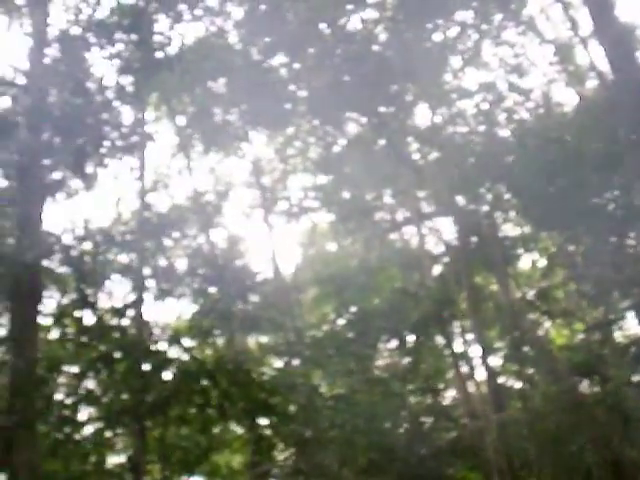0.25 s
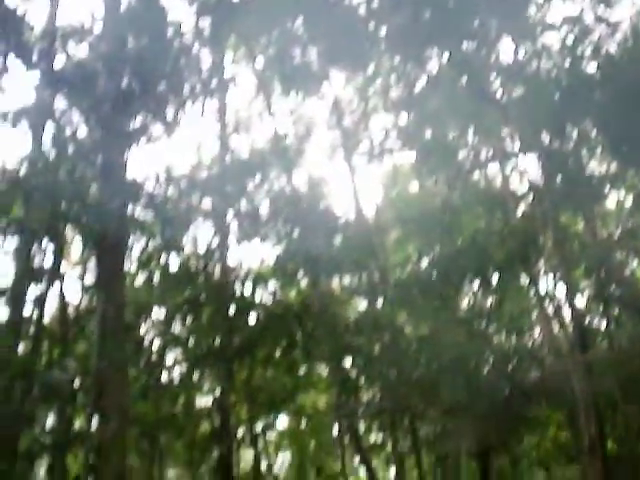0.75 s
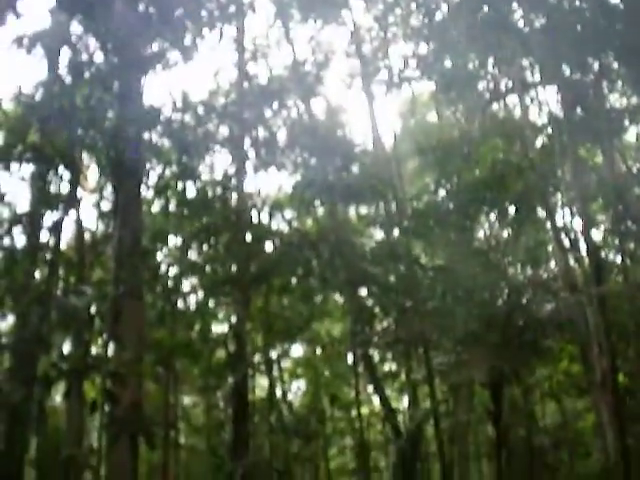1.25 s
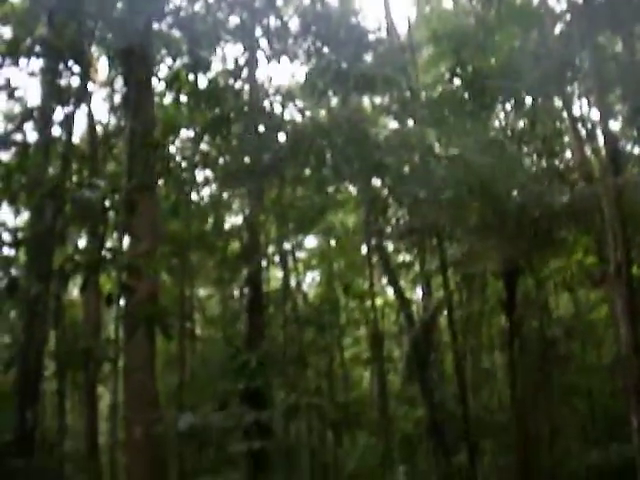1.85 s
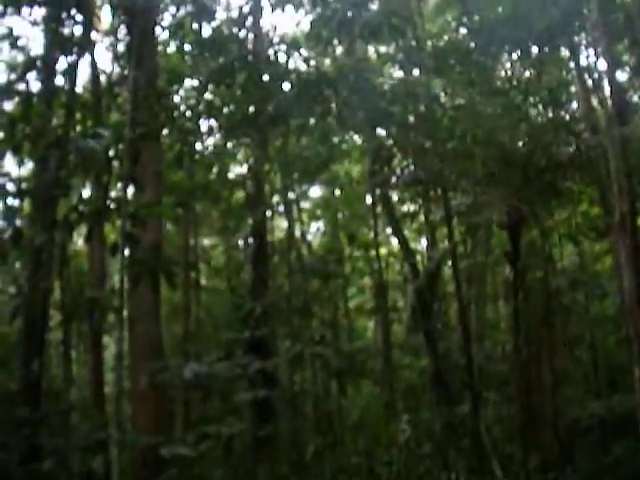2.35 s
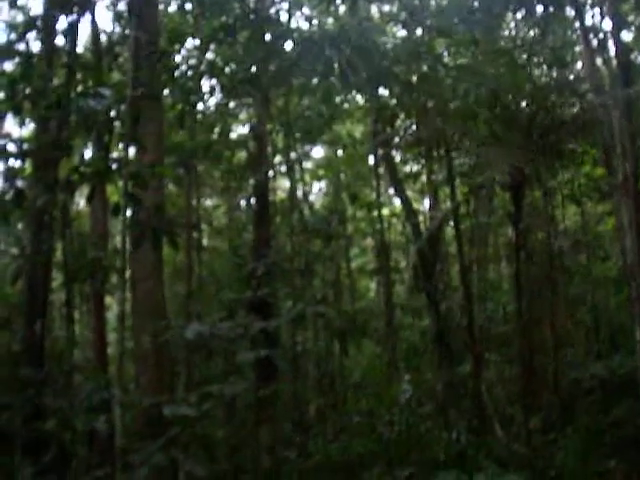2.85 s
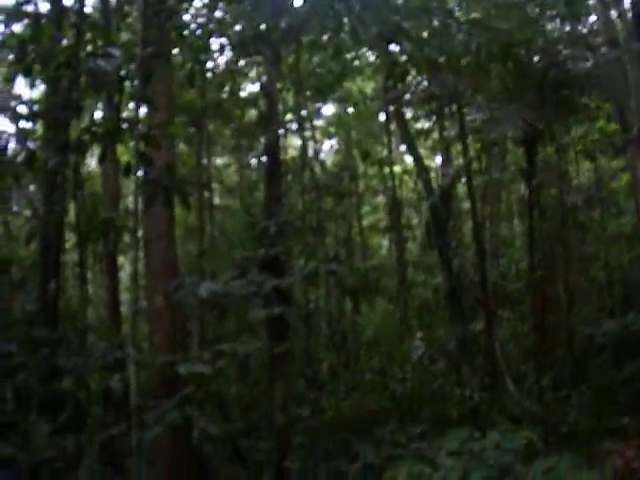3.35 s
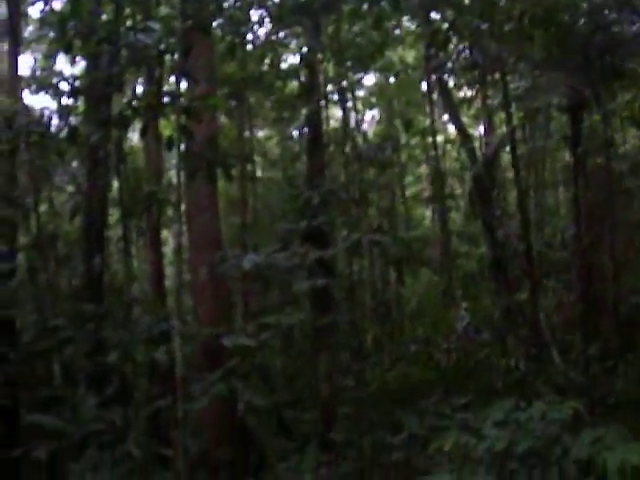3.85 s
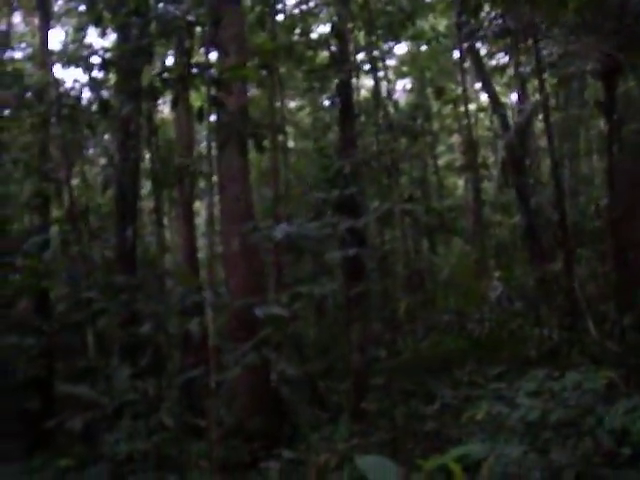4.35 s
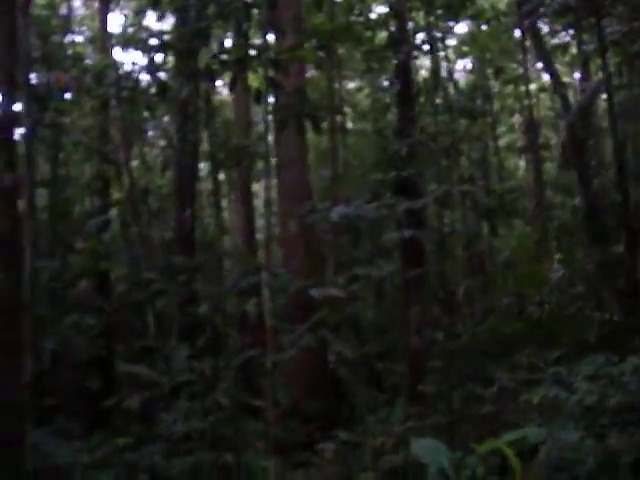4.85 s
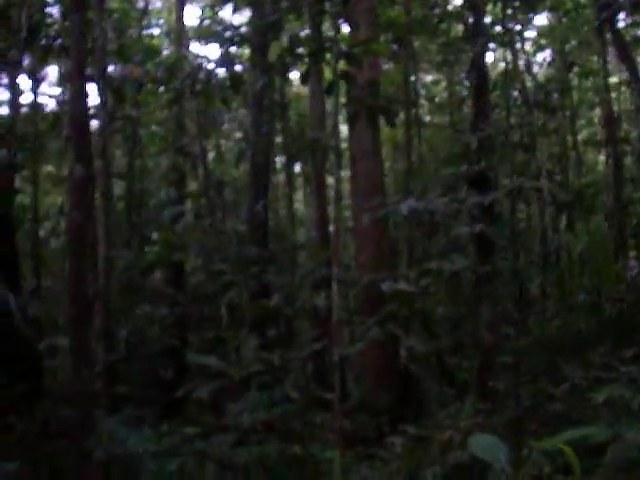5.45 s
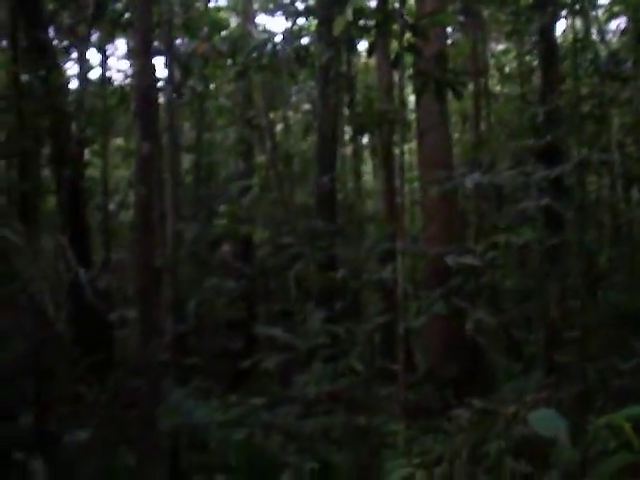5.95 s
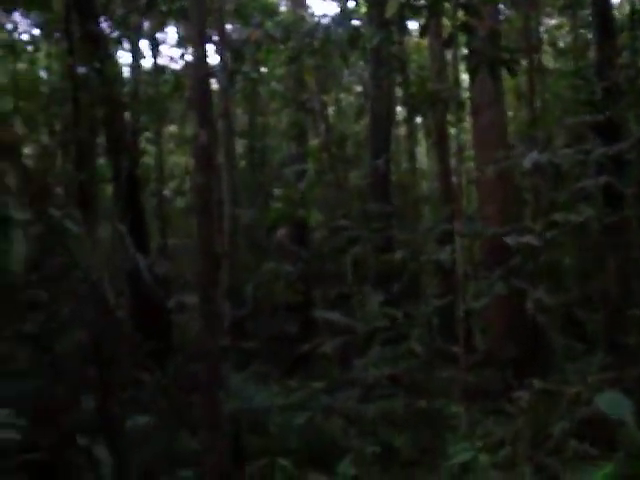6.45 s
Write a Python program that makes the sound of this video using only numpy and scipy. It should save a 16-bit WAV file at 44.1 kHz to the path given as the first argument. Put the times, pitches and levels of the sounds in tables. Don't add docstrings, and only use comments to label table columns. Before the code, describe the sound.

Continuous high cicada singing among trees, heard through a cheap mono camera with dull, cut-off treble. The closest insect pulses quickly, pauses briefly around three seconds, throbs strongly, then cuts out past four seconds with a short woodland echo. Softer distant cicadas shimmer on to the end, one swelling and sinking slightly lower, over steady hiss, electrical buzz, a faint whine and small casing clicks.

```python
import sys
import numpy as np
from scipy import signal
from scipy.fft import rfft, irfft
from scipy.io import wavfile

SR = 44100
rng = np.random.default_rng(int(sys.argv[2]) if len(sys.argv) > 2 else 0)


def ratio(d):
    e = np.asarray(d, float) / 20
    return 10 ** e


def output_pcm(signal):
    pcm = np.clip(np.atleast_2d(signal).T, -1, 1) * 32767
    wavfile.write(sys.argv[1], SR, np.round(pcm).astype(np.int16))


N = 295007

# [t/s, level/dB]
NEAR_EFFORT = [
    (0, -47),
    (.22, -53),
    (.36, -49),
    (.7, -51.5),
    (1.2, -47.5),
    (1.5, -51),
    (2.6, -50.5),
    (3.45, -48.5),
    (4.0, -47),
]
# [f/Hz, width/Hz, level/dB]
NEAR_BODY = [
    (6380, 240, 0),
    (6130, 280, -12),
    (6720, 400, -12),
]
# [first throb t/s, rate/Hz, depth reached by then/dB]
THROB_RUNS = [
    (.02, 6.8, 4),
    (1.64, 7.87, 5),
    (3.06, 2.95, 8),
    (3.4, 6.9, 15),
    (4.26, 6.9, 15),
]
NEAR_STOP_S, NEAR_RELEASE_S = 4.16, 0.048
# [t/s, level/dB, upper group against lower group/dB]
FAR_LEVEL = [
    (0, -48, -5),
    (1.2, -50.5, -6.5),
    (2.3, -50, -7.5),
    (3.6, -50.5, -6.5),
    (4.3, -51, -5.5),
    (6.69, -51, -5.5),
]
# [f/Hz, width/Hz, level/dB, filter steepness]
FAR_BODY = [
    (6180, 430, 0, 2),
    (6750, 480, .5, 3),
]
# [crest t/s, lift/dB]
WAVES = [
    (.42, 1.5),
    (1.2, 4),
    (1.76, 1),
    (2.2, 2),
    (2.9, 0.5),
    (4.4, 1.5),
    (4.9, 2),
    (5.4, 2.5),
    (5.9, 1.5),
    (6.35, 2),
]
WAVE_S, UPPER_SHARE = 0.11, 0.46
# [crest t/s, level/dB]
LOW_SWELLS = [
    (.5, -59.5),
    (1.6, -60.5),
    (2.85, -57),
    (4.13, -58),
    (5.0, -64.5),
    (5.3, -60.5),
    (6.05, -64),
    (6.65, -60.5),
]
# [f/Hz, width/Hz, level/dB]
LOW_BODY = [
    (5620, 380, 0),
]
LOW_REST_DB, SWELL_DB_PER_S, SINK_DB_PER_S = -73, 21, 46
# [f/Hz, level per Hz/dB]
HISS = [(15, -2), (30, 1.5), (55, 1), (100, -1.5), (200, -2), (400, -3), (1000, -7.5), (1600, -10.5),
        (2200, -12.5), (3500, -15.5), (5000, -18), (8000, -17.5)]
HISS_DB = -47.5
FRAME_HZ, SCREEN_HZ = 29.995, 59.828
# [f/Hz, level/dB]
WHINE = [
    (7499, -66.5),
]
# [t/s, peak level/dB, ring f/Hz, width/Hz]
TICKS = [(.2548, -46, 7400, 1000), (.455, -45, 7700, 600), (.5612, -33, 7500, 900),
         (.5612, -38, 4500, 4000), (2.6595, -28.5, 1800, 1300), (2.8115, -36, 3500, 2200),
         (4.3824, -46, 7600, 800), (5.434, -48, 3600, 300), (5.441, -48, 3600, 300),
         (5.7605, -26.5, 5100, 4200), (5.7606, -38, 7600, 900), (5.7613, -31, 6000, 1400),
         (5.7617, -35, 3300, 2000), (5.7675, -36, 7000, 1500), (5.983, -42, 3500, 2000),
         (6.1375, -42, 1500, 1200), (6.354, -42, 2600, 1200), (6.363, -41, 3100, 900),
         (6.418, -47, 3600, 300), (6.479, -43, 3650, 500), (6.483, -44, 2800, 1200)]
SAMPLING = (160, 441)
# [f/Hz, level/dB]
SKIRT = [(5500, -1), (7000, 1), (7500, -5.5), (8000, -11), (8500, -20), (8800, -29.5), (9050, -39.5),
         (9300, -61.5)]


def evened(x):
    return x / np.sqrt(np.mean(x ** 2) + 1e-20)


def read(points, hz):
    f, value = np.transpose(points)
    return np.interp(np.log(hz + 1), np.log(f + 1), value)


def curves(rows):
    s, *columns = np.transpose(rows)
    return [np.interp(np.arange(N) / SR, s, column) for column in columns]


def resonate(x, hz, width, order=2):
    band = [hz - width / 2, hz + width / 2]
    return signal.sosfilt(signal.butter(order, band, "bandpass", fs=SR, output="sos"), x)


def smooth(x, hz):
    r = np.exp(-2 * np.pi * hz / SR)
    return signal.lfilter([1 - r], [1, -r], x)


def trunks(x, t60, wet_db, turn_s):
    hop = round(turn_s * SR)
    at = np.arange(200, SR // 2 - 20, 20)
    padded = np.pad(x, (hop, 2 * hop))
    wet = np.zeros(N + 3 * hop + SR)
    for start in range(0, N + hop, hop):
        taps = np.zeros(SR // 2)
        signs = rng.choice([-1., 1.], len(at))
        taps[at + rng.integers(0, 20, len(at))] = signs * ratio(-60 * at / SR / t60)
        piece = padded[start:start + 2 * hop] * signal.windows.cosine(2 * hop)
        echo = signal.fftconvolve(piece, taps / np.linalg.norm(taps))
        wet[start:start + len(echo)] += echo
    return x + ratio(wet_db) * wet[hop:hop + N]


def tymbals(count, per_s, unevenness, size_db):
    wobble = evened(smooth(rng.standard_normal((count, N)), 60))
    rates = per_s * rng.uniform(.9, 1.1, (count, 1)) * (1 + unevenness * wobble)
    cycles = np.cumsum(rates, axis=1) / SR + rng.random((count, 1))
    clicks = np.diff(np.floor(cycles), prepend=0) > 0
    sizes = ratio(size_db * rng.standard_normal((count, N)))
    return (clicks * sizes).sum(0)


def near_cicada():
    t = np.arange(N) / SR
    first, per_s, depth_db = np.transpose(THROB_RUNS)
    early = t + .02
    run = np.clip(np.searchsorted(first, early) - 1, 0, None)
    turn = (early - first[run]) * per_s[run] % 1
    throb = np.interp(turn, [0, .2, .7, .82, 1], [0, .1, .9, 1, 0])
    clicks = tymbals(count=1, per_s=300, unevenness=.22, size_db=1.4)
    sides = (1, -1, -1)
    song = evened(sum(side * ratio(db) * resonate(clicks, hz, width)
                      for side, (hz, width, db) in zip(sides, NEAR_BODY)))
    song *= ratio(curves(NEAR_EFFORT)[0] - np.interp(t, first, depth_db) * throb)
    song *= np.clip((NEAR_STOP_S - t) / NEAR_RELEASE_S, 0, 1)
    return ratio(1.0) * trunks(song, t60=0.16, wet_db=-2.0, turn_s=0.3)


def far_chorus():
    t = np.arange(N) / SR
    level_db, upper_db = curves(FAR_LEVEL)
    lift_db = sum(db * np.exp(-((t - s) / WAVE_S) ** 2) for s, db in WAVES)
    groups = []
    for hz, width, db, steepness in FAR_BODY:
        clicks = tymbals(count=5, per_s=200, unevenness=.2, size_db=5.5)
        clicks = trunks(clicks, t60=1.0, wet_db=8.0, turn_s=0.25)
        groups.append(ratio(db) * evened(resonate(clicks, hz, width, order=steepness)))
    lower = ratio(lift_db) * groups[0]
    upper = ratio(upper_db + UPPER_SHARE * lift_db) * groups[1]
    return ratio(level_db) * (lower + upper)


def low_cicada():
    crest_s, crest_db = np.transpose(LOW_SWELLS)[:, :, None]
    late = np.arange(N) / SR - crest_s
    swells_db = crest_db - np.maximum(-SWELL_DB_PER_S * late, SINK_DB_PER_S * late)
    level_db = np.maximum(swells_db.max(0), LOW_REST_DB)
    clicks = tymbals(count=2, per_s=180, unevenness=.2, size_db=2.0)
    clicks = trunks(clicks, t60=0.3, wet_db=8.5, turn_s=0.25)
    song = sum(ratio(db) * resonate(clicks, hz, width, order=1) for hz, width, db in LOW_BODY)
    return ratio(level_db + 3.5) * evened(song)


def hiss():
    z = rfft(rng.standard_normal(N)) * ratio(read(HISS, np.fft.rfftfreq(N, 1 / SR)))
    return ratio(HISS_DB + 2.5) * evened(irfft(z, N))


def supply_buzz():
    t = np.arange(N) / SR
    frame, wait = np.divmod((t - .0035) * FRAME_HZ, 1)
    frame = frame.astype(int) + 1
    left = (1 - wait) / FRAME_HZ
    draw = rng.random((frame.max() + 1, 2))
    begin = .0041 - .0022 * draw[:, 0] ** 2
    end = .0022 * draw[:, 1] ** 8
    place = np.arange(len(draw)) % 15
    begin[place == 10], end[place == 10] = .0078, .0040
    begin[place == 11] = .0068
    resting = (left < begin[frame]) * (left > end[frame])
    rest = ratio(-36.5) * smooth(resting, 280)
    since = ((t - .0090) * SCREEN_HZ % 1) / SCREEN_HZ
    refresh = -ratio(-42) * smooth(smooth(since < .0014, 240), 240)
    both = rest + refresh
    return both - smooth(both, 7.9)


def whine():
    t = np.arange(N) / SR
    return sum(ratio(db + 7.5) * np.sin(2 * np.pi * hz * t) for hz, db in WHINE)


def ticks():
    out, snap = np.zeros(N), signal.unit_impulse(300)
    for s, db, hz, width in TICKS:
        ring = resonate(snap, hz, width)
        out[round(s * SR):][:len(ring)] += ratio(db) * ring / abs(ring).max()
    return trunks(out, t60=0.046, wet_db=-6.5, turn_s=0.8)


def scene():
    singers = near_cicada() + far_chorus() + low_cicada()
    camera = hiss() + supply_buzz() + whine() + ticks()
    mono = singers + camera
    return np.array([mono, mono])


def roll_off(x):
    return signal.sosfilt(signal.butter(12, 9250, fs=SR, output="sos"), x)


def record(dry):
    blocks = N // SAMPLING[1] + 1
    length = blocks * SAMPLING[1]
    z = rfft(dry, length)
    rate = blocks * SAMPLING[0]
    z[:, rate // 2:rate] = np.conj(z[:, rate // 2:0:-1])
    z *= ratio(read(SKIRT, np.fft.rfftfreq(length, 1 / SR)))
    mix = irfft(z, length)[:, :N]
    return roll_off(mix)


dry = scene()
out = record(dry)
output_pcm(out)
```